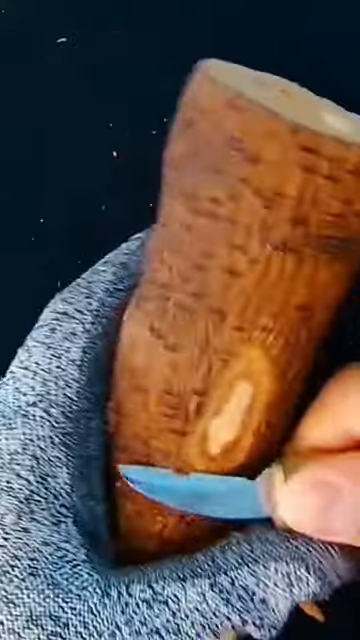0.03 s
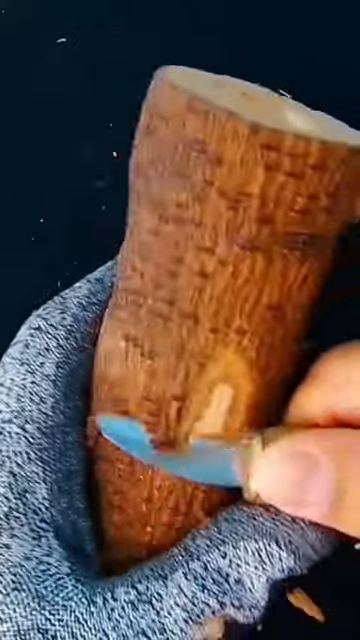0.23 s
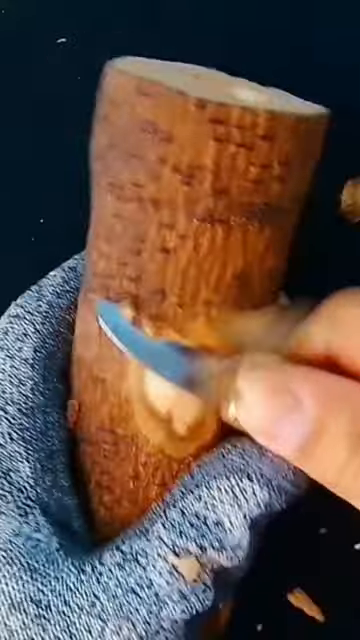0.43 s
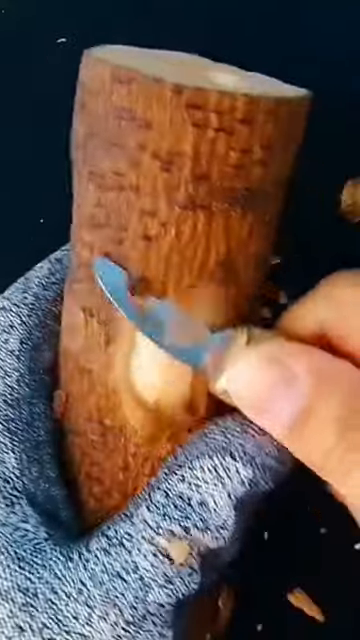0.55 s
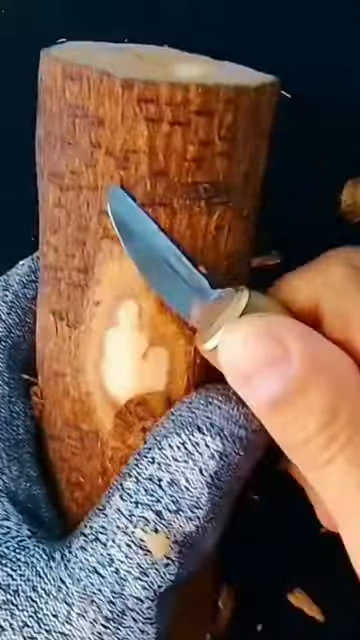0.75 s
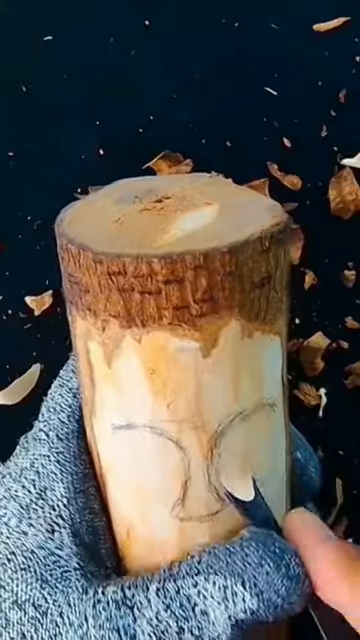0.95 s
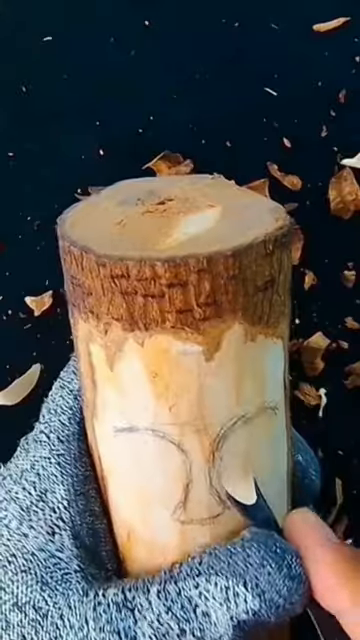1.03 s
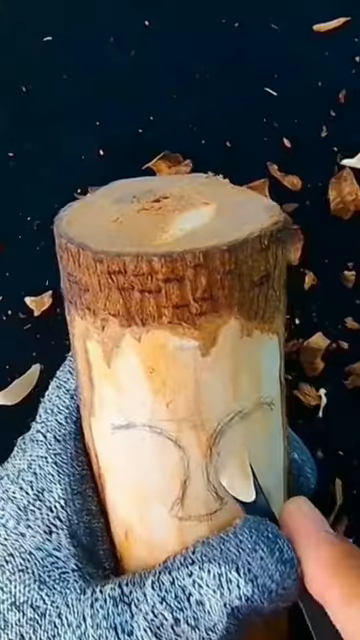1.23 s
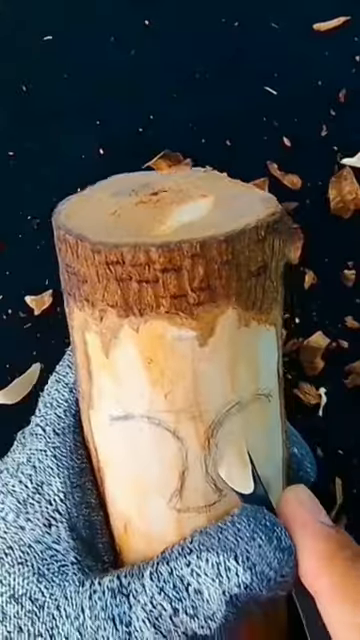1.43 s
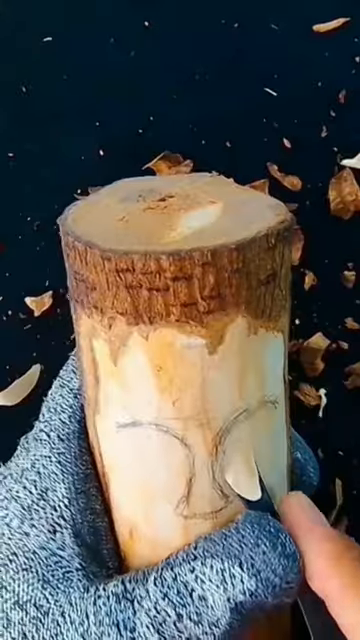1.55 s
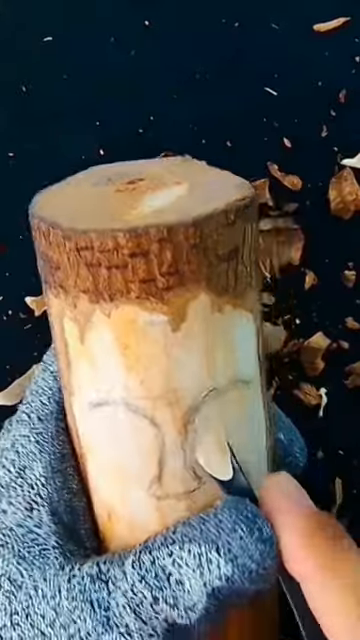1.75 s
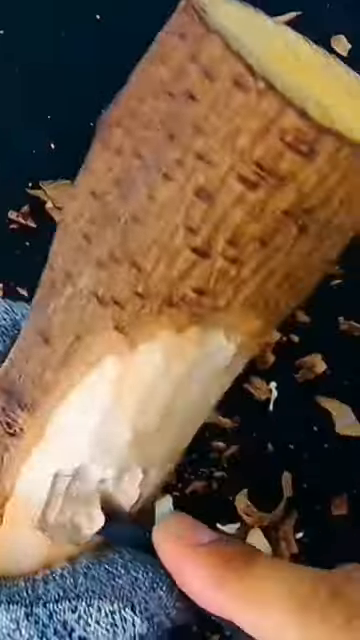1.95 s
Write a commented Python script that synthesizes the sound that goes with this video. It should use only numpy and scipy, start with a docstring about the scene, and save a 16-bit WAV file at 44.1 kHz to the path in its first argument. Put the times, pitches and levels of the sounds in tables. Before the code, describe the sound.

Close knife carving on a log: crackling bark snaps, then faint, squeaky slicing.

```python
"""A small knife is pushed through the bark of a hand-held log, close to the microphone in a small room.
The edge drags and crackles, and the bark breaks in sharp snaps that ring in wood and blade and thump the
bench. Just after a dull knock this sound cuts off at an edit. In a second scene the tip slices quietly
through bare wood with a thin squeak; another knock and the start of a new scrape follow.
Handling rumble and faint room tone lie underneath."""
import sys
import numpy as np
from scipy import signal
from scipy.fft import rfft, irfft
from scipy.io import wavfile
from scipy.ndimage import uniform_filter1d

SR = 44100
rng = np.random.default_rng(int(sys.argv[2]) if len(sys.argv) > 2 else 0)


def dump_mix(stems):
    """Bounce the given channels to the path in sys.argv[1] as a 16-bit WAV at rate SR."""
    frames = np.atleast_2d(stems).T  # one column per channel
    limited = np.clip(frames, -1, 1)  # hard clip at full scale
    pcm = np.round(limited * 32767).astype(np.int16)
    wavfile.write(sys.argv[1], SR, pcm)


N = 88200
T = np.arange(N) / SR


def amp(db):
    """Decibels to gain."""
    return 10 ** (np.asarray(db) / 20)


def unit_rms(x):
    """Scales to rms 1."""
    return x / np.sqrt(np.mean(x ** 2) + 1e-20)


def unit_energy(x):
    """Scales to energy 1."""
    return x / np.sqrt(np.sum(x ** 2) + 1e-20)


def burst(x, db):
    """Gives a click the energy of three milliseconds at this level."""
    return unit_energy(x) * amp(db) * np.sqrt(.003 * SR)


def at_hz(points, hz):
    """Interpolates a table on a log-frequency axis."""
    freqs, values = np.transpose(points)
    return np.interp(np.log(hz + 1), np.log(freqs + 1), values)


def fader(levels):
    """Gain at every sample from rows of seconds and dB."""
    return amp(np.interp(T, *np.transpose(levels)))


def add(mix, start, sound):
    """Mixes a sound in at a time in seconds."""
    part = mix[max(round(start * SR), 0):][:len(sound)]
    part += sound[:len(part)]


def colour(x, spectrum, size=8192):
    """Minimum-phase filter with the given spectrum."""
    cepstrum = irfft(np.log(amp(at_hz(spectrum, np.fft.rfftfreq(size, 1 / SR)))))
    cepstrum[1:size // 2] *= 2
    cepstrum[size // 2 + 1:] = 0
    impulse = irfft(np.exp(rfft(cepstrum)))[:size // 2]
    return signal.fftconvolve(x, impulse)[:len(x)]


def resonate(x, hz, width_hz, passes=1):
    """A band-pass resonance, steeper with each pass."""
    for _ in range(passes):
        x = signal.lfilter(*signal.iirpeak(hz, hz / width_hz, SR), x)
    return x


def modes(table, t):
    """Dying sines of a struck body."""
    return sum(amp(db - 60 * t / t60) * np.sin(2 * np.pi * hz * t) for hz, db, t60 in table)


def slips(per_second=4000, spread_db=2.5):
    """Friction as a dense train of tiny clicks of uneven size."""
    sizes = rng.standard_normal(N) * amp(spread_db * np.minimum(rng.exponential(1, N), 4))
    return sizes * (rng.random(N) < per_second / SR)


# The edge in the bark, close up. Each row: time in seconds, level in dB.
DRAG_LEVELS = [(0, -62), (.14, -70.5), (.2, -53), (.36, -61), (.42, -51.5), (.5, -59.5), (.56, -45.5),
               (.69, -51), (.75, -48.5), (.82, -47.5), (.91, -60)]
# Its tone. Each row: frequency in Hz, gain in dB.
DRAG_SPECTRUM = [(150, 2.5), (600, -4.5), (1400, -5.5), (2100, -4), (2900, 5), (3400, 0.5), (3900, -2),
                 (5200, -4), (7000, -12.5), (16000, -41.5)]
def bark_drag():
    """The edge drags through bark in tiny slips."""
    return unit_rms(colour(slips(), DRAG_SPECTRUM)) * fader(DRAG_LEVELS)


# Squeaks in the cut. Each row: start and length in seconds, first and last pitch in Hz, level in dB.
BLADE_SQUEAKS = [(0, 0.14, 3700, 3790, -64.5), (0.788, 0.13, 4690, 4670, -59.5),
                 (0.911, 0.11, 7470, 7900, -69.5), (1.172, 0.13, 7430, 7160, -68.5),
                 (1.308, .2, 7160, 7060, -70)]
def squeaks(width_hz=110, chatter_hz=1130, chatter_depth=.65, edge_s=.0065, sag_db_per_s=54):
    """Steel whistles unsteadily in tight wood, with side bands from its chatter and a skirt of hiss."""
    out = np.zeros(N)
    slow = signal.butter(2, width_hz / 2, fs=SR, output="sos")
    for start, length, from_hz, to_hz, db in BLADE_SQUEAKS:
        t = T[:round(length * SR)]
        noise = rng.standard_normal((4, N))
        cos_gain, sin_gain, wobble = signal.sosfilt(slow, noise[1:])[:, -len(t):]
        phase = 2 * np.pi * np.cumsum(np.linspace(from_hz, to_hz, len(t))) / SR
        chatter_phase = 2 * np.pi * np.cumsum(chatter_hz * (1 + .053 * unit_rms(wobble))) / SR
        chatter = 1 + chatter_depth * np.cos(chatter_phase)
        whistle = unit_rms(chatter * (cos_gain * np.cos(phase) + sin_gain * np.sin(phase)))
        hiss = unit_rms(resonate(noise[0, :len(t)], from_hz, from_hz / 2, passes=2))
        gate = np.minimum(np.minimum(t, length - t) / edge_s, 1)
        add(out, start, gate * amp(db - sag_db_per_s * t) * (whistle + amp(-9) * hiss))
    return out


# Hands on log and bench, near the microphone. Each row: time in seconds, level in dB.
HANDLING_LEVELS = [(0, -51.5), (.45, -41.5), (.6, -34.5), (.8, -40), (.93, -53), (1.42, -58), (1.6, -64.5),
                   (1.92, -62.5), (2, -54)]
# Their tone. Each row: frequency in Hz, gain in dB.
HANDLING_SPECTRUM = [(10, -18.5), (28, -4.5), (50, -6.5), (72, 3.5), (86, -2.5), (130, -14.5), (200, -21),
                     (1200, -52)]
def handling():
    """The hands make a low rumble that swells with the stroke."""
    return unit_rms(colour(rng.standard_normal(N), HANDLING_SPECTRUM)) * fader(HANDLING_LEVELS)


# Room tone at the microphone. Each row: frequency in Hz, gain in dB.
AIR_SPECTRUM = [(25, 19.5), (60, 2.5), (200, -5), (420, -5), (800, -10), (1500, -15.5), (3600, -20.5),
                (5000, -24), (16000, -47.5)]
def room_tone():
    """The still air of the room is a faint, steady, low noise."""
    return amp(-51.5) * unit_rms(colour(rng.standard_normal(N), AIR_SPECTRUM))


LEAD_S = 400 / SR  # run-up before each break
def fracture(spread_s, evenness=.6, band_hz=200):
    """Fibres give way: a faint run-up, one break, then a dying cluster of smaller ones."""
    t = T[:2048] - LEAD_S
    run_up = amp(-18.5) * np.exp(-abs(t) / (spread_s + .00036))
    envelope = np.where(t < 0, run_up, np.exp(-abs(t) / spread_s))
    fibres = unit_energy(envelope * rng.standard_normal(len(t)) * (rng.random(len(t)) < .45))
    fibres[round(LEAD_S * SR)] += .43 * np.exp(-spread_s / .0045)
    # A partly flattened spectrum leaves the break with no pitch of its own.
    spectrum = rfft(fibres)
    power = uniform_filter1d(abs(spectrum) ** 2, round(band_hz * len(t) / SR))
    return irfft(spectrum / power ** (evenness / 2))


# Bark breaking, close up. Each row: time and spread in seconds, crack, splinter and ring levels in dB,
# ring pitch in Hz.
BARK_SNAPS = [(0.0714, 0.000067, -56, -48.5, -37.5, 2274), (0.072, 0.00055, -60.5, -55, -40, 2880),
              (0.1926, 0.0011, -45, -53, -57.5, 2700), (0.2052, 0.0025, -38.5, -51, -41, 2790),
              (0.2107, 0.004, -38.5, -41, -56, 2670), (0.228, 0.002, -39.5, -57, -43, 2570),
              (0.243, 0.0014, -41, -60, -37, 2650), (0.2553, 0.0022, -39, -57, -43, 2580),
              (0.279, 0.0018, -39, -60, -36, 2820), (0.3357, 0.00035, -35, -45.5, -30.5, 2550),
              (0.3764, 0.0011, -34.5, -36.5, -25.5, 2850), (0.4, 0.0024, -44, -50, -45, 2880),
              (0.4095, 0.00082, -34, -21.5, -26, 2826), (.4800, 0.0021, -39.5, -47.5, -44, 2700),
              (.5250, 0.0015, -31.5, -18, -26.5, 2965), (0.5276, 0.0046, -44, -62, -24.5, 2800),
              (0.5315, 0.00095, -34.5, -50.5, -32.5, 2600), (.5761, 0.0002, -39, -20.5, -39.5, 2400),
              (0.5779, 0.0017, -33, -26.5, -29.5, 2930), (0.6505, 0.00085, -23.5, -18.5, -22, 2906),
              (0.6592, 0.00033, -38.5, -48.5, -35.5, 2800), (0.7226, 0.00024, -28.5, -22.5, -22, 3000),
              (0.769, 0.0017, -29.5, -53, -26.5, 2550), (0.7759, 0.0024, -36, -62, -27, 2860),
              (0.7812, 0.0027, -35.5, -47, -40, 2950)]
# Tone of a crack. Each row: frequency in Hz, gain in dB.
CRACK_SPECTRUM = [(100, -13.5), (300, 4), (600, -4.5), (1100, -1), (1700, -2.5), (2400, 0.5), (3900, 5.5),
                  (5400, 4), (6800, -3), (8500, -4), (16000, -6.5)]
# Splinters along the stroke. Each row: time in seconds, band centre in Hz.
SPLINTER_CENTRES = [(.41, 12800), (.576, 11230), (.65, 14200), (.72, 15100)]
SPLINTER_HIGHPASS = signal.butter(2, 7600, "high", fs=SR)
def bark_snaps(ring_width_hz=616, overtone_ratio=1.84):
    """Each break cracks and rings briefly in the wood; its bright splinters are returned separately."""
    wood, splinters = np.zeros((2, N))
    for start, spread_s, crack_db, splinter_db, ring_db, ring_hz in BARK_SNAPS:
        crack = burst(colour(fracture(spread_s), CRACK_SPECTRUM), crack_db)
        splinter_hz = np.interp(start, *np.transpose(SPLINTER_CENTRES))
        treble = signal.lfilter(*SPLINTER_HIGHPASS, fracture(spread_s))
        splinter = resonate(treble, splinter_hz, width_hz=4500)
        ring = resonate(fracture(spread_s), ring_hz, ring_width_hz, passes=2)
        overtone = resonate(fracture(spread_s), overtone_ratio * ring_hz, ring_width_hz)
        add(wood, start - LEAD_S, crack + burst(ring, ring_db) + burst(overtone, ring_db - 17.5))
        add(splinters, start - LEAD_S, burst(splinter, splinter_db))
    return wood, splinters


# Modes of the knife. Each row: frequency in Hz, relative level in dB, seconds to fall 60 dB.
BLADE_MODES = [(2320, 1, 0.24), (2620, -7, .3), (2810, -1.5, 0.29), (3070, -1, 0.35), (3300, -3, 0.52),
               (4740, -9.5, 0.31)]
def blade_ring(wood):
    """The breaks set the steel ringing faintly."""
    ring = signal.fftconvolve(wood, modes(BLADE_MODES, T[:SR // 2]))[:N]
    return amp(-19) * wood.std() * unit_rms(ring)


def splinter_hiss(splinters, t60=.3):
    """The splinters linger in the room as a grainy hiss that dies away after each break."""
    decay = 1e6 ** (-T[:SR // 2] / t60)
    power = abs(signal.fftconvolve(splinters ** 2, decay / decay.sum())[:N])
    hiss = signal.lfilter(*SPLINTER_HIGHPASS, slips())
    return amp(-16.5) * np.sqrt(power) * unit_rms(hiss)


# The small room around the microphone. Each row: frequency in Hz, seconds to fall 60 dB.
ROOM_DECAY = [(200, 0.2), (3000, 0.36), (9000, 0.12), (16000, 0.26)]
def reflections(x, early_s=.0025, hand_moves_per_s=2.893):
    """Quick reflections from hands and bench, then a faint tail; both shift as the hands move."""
    out, t = np.zeros(N), T[:SR // 2]
    for k in range(3):  # three echo patterns, crossfaded in turn
        near, far = rng.standard_normal((2, len(t)))
        early = near * (rng.random(len(t)) < .2) * (t > .001) * np.exp(-t / early_s)
        early = signal.lfilter(*signal.butter(1, 6450, fs=SR), early)
        hz, times, bands = signal.stft(far * np.minimum(t / .01, 1), SR, nperseg=256)
        decay = 1000 ** (-times / at_hz(ROOM_DECAY, hz)[:, None])
        tail = signal.istft(bands * decay, SR, nperseg=256)[1][:len(t)]
        echoes = amp(-7.5) * unit_energy(early) + amp(-13.5) * unit_energy(tail)
        share = np.sqrt(2 / 3) * np.cos(2 * np.pi * (hand_moves_per_s * T + k / 3))
        out += signal.fftconvolve(x * share, echoes)[:N]
    return out


# Jolts of the bench under the log. Each row: start in seconds, level in dB.
BENCH_JOLTS = [(0.209, -36.5), (0.2566, -30), (0.3367, -39), (.408, -34.5), (0.5363, -26.5), (0.58, -24.5),
               (0.66, -23), (0.722, -28), (0.782, -28)]
# Modes of the bench. Each row: frequency in Hz, relative level in dB, seconds to fall 60 dB.
BENCH_MODES = [(72.6, -0.5, 0.34), (106.4, -10, 0.12), (130.7, -9.5, 0.11), (300, -24, 0.18)]
def bench_thumps():
    """As the bark gives way the log jolts the bench, which booms low."""
    out, boom = np.zeros(N), modes(BENCH_MODES, T[:SR // 2])
    for start, db in BENCH_JOLTS:
        add(out, start, amp(db) * boom)
    return signal.sosfilt(signal.butter(2, 35, "high", fs=SR, output="sos"), out)


# The deeper breaks. Each row: start in seconds, level in dB, hardness as a tilt in dB per octave.
DEEP_BREAKS = [(0.2105, -44, 7), (0.2809, -41.5, 3.5), (0.3347, -33.5, -7.5), (.377, -35, -14.5),
               (0.5242, -39, 2), (0.6487, -44.5, -8), (0.7229, -34, 2.5), (0.7696, -31.5, 0.5)]
# Modes of the log. Each row: frequency in Hz, level before the tilt in dB, seconds to fall 60 dB.
LOG_MODES = [(172.4, -1.5, 0.046), (332, -18, 0.2), (562, -6.5, .02), (761, -9.5, 0.023)]
def log_body():
    """Deep breaks knock in the body of the log; harder ones favour its higher modes."""
    out = np.zeros(N)
    for start, db, tilt_db in DEEP_BREAKS:
        struck = [(hz, mode_db + tilt_db * np.log2(hz), t60) for hz, mode_db, t60 in LOG_MODES]
        add(out, start, burst(modes(struck, T[:SR // 5]), db))
    return out


# Dull knocks of the log, close up. Each row: start in seconds, level in dB, click level in dB.
DULL_KNOCKS = [(0.86, -51, -61), (1.829, -46.5, -48)]
# Tones of the thud and of the click. Each row: frequency in Hz, gain in dB.
THUD_SPECTRUM = [(80, -1.5), (200, -3), (540, -1.5), (720, -6), (1300, -8), (2500, -15.5), (7000, -31),
                 (16000, -65)]
CLICK_SPECTRUM = [(300, -15), (1200, -13), (2800, 5), (5000, -1), (8000, -15), (16000, -37.5)]
# The wooden note. Each row: frequency in Hz, relative level in dB, seconds to fall 60 dB.
KNOCK_MODES = [(554, -2.5, 0.28), (406, -8, 0.48)]
def dull_knocks(fast_t60=.031, tail_t60=.43):
    """The log knocks: a click, then a diffuse thud with a wooden note."""
    out, t = np.zeros(N), T[:SR // 3]
    for start, db, click_db in DULL_KNOCKS:
        fade = 1000 ** (-t / fast_t60) + amp(-.5) * 1000 ** (-t / tail_t60)
        thud = fade * unit_rms(colour(rng.standard_normal(len(t)), THUD_SPECTRUM))
        add(out, start, amp(db) * (thud + modes(KNOCK_MODES, t)))
        click = colour(fracture(spread_s=.0012), CLICK_SPECTRUM)
        add(out, start - LEAD_S, burst(click, click_db))
    return out


# The tip in bare wood, quiet even this close. Each row: time in seconds, level in dB.
SLICE_LEVELS = [(.89, -77.5), (.915, -71.5), (1.2, -69.5), (1.42, -84), (1.8, -78), (1.952, -71),
                (1.96, -56), (2, -55)]
# Its tone. Each row: frequency in Hz, gain in dB.
SLICE_SPECTRUM = [(400, -2), (1700, -5), (2400, -1), (3050, -10), (5200, -4.5), (6700, -11), (7750, -1),
                  (9500, -17.5), (16000, -13.5)]
def wood_slice():
    """The tip slices bare wood in tiny slips, louder as the new scrape starts."""
    return unit_rms(colour(slips(), SLICE_SPECTRUM)) * fader(SLICE_LEVELS)


# Light ticks at the tip. Each row: time in seconds, level in dB.
TIP_TICKS = [(.909, -63.5), (1.332, -65), (1.6449, -52.5)]
# Their tone. Each row: frequency in Hz, gain in dB.
TICK_SPECTRUM = [(300, -22), (3000, -13), (6000, 2), (8500, 2), (16000, -12)]
def ticks():
    """Single fibres part under the tip."""
    out = np.zeros(N)
    for start, db in TIP_TICKS:
        tick = colour(fracture(spread_s=.0013), TICK_SPECTRUM)
        add(out, start - LEAD_S, burst(tick, db))
    return out


# The flat of the blade on bare wood. Each row: time in seconds, level in dB.
RUB_LEVELS = [(1.38, -90), (1.46, -76), (1.8, -74.5), (1.952, -79.5), (1.96, -59), (2, -57.5)]
def blade_rub():
    """Steel rubs on wood with a soft band of hiss."""
    hiss = resonate(rng.standard_normal(N), hz=3650, width_hz=1100, passes=2)
    return unit_rms(hiss) * fader(RUB_LEVELS)


def scene(edit_s=.912, edit_fade_s=.0065):
    """The sound of the bark stroke cuts off at an edit; a second scene of quiet slicing follows."""
    wood, splinters = bark_snaps()
    wood += log_body()
    stroke = wood + splinters + blade_ring(wood) + reflections(wood)
    stroke += splinter_hiss(splinters) + bench_thumps() + bark_drag()
    before_edit = np.clip((edit_s - T) / edit_fade_s + 1, 0, 1)
    cutting = wood_slice() + blade_rub() + squeaks() + ticks()
    return (stroke * before_edit + cutting + dull_knocks() + handling() + room_tone())[None]


def record(dry):
    """One close microphone, into a recorder that passes sound up to 16.3 kHz."""
    lowpass = signal.firwin(161, 16300, window=("kaiser", 9), fs=SR)
    return signal.oaconvolve(dry, lowpass[None], "same")


dry = scene()
out = record(dry)
dump_mix(out)
```